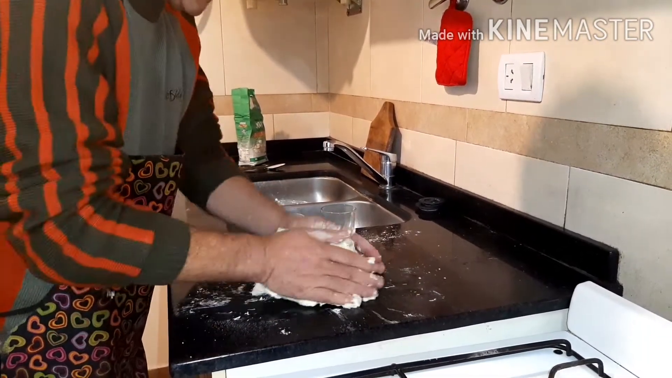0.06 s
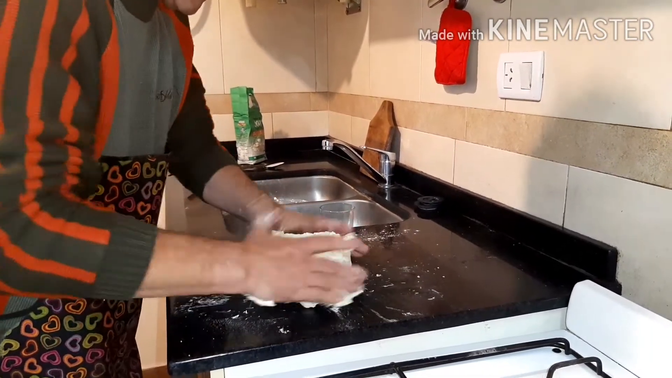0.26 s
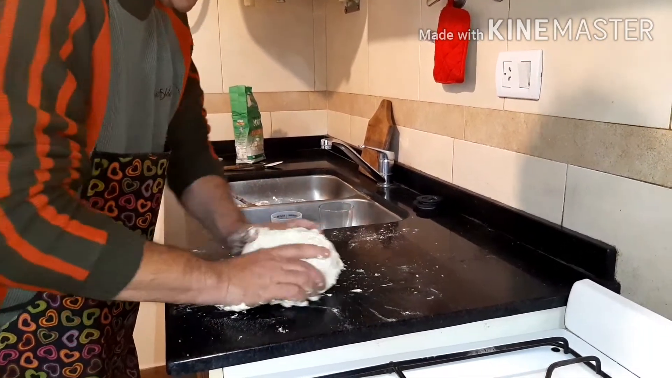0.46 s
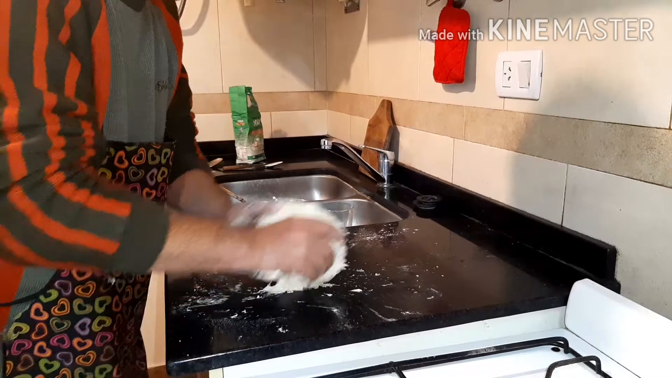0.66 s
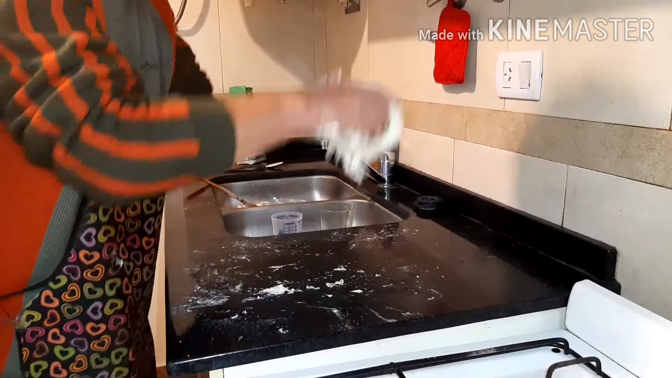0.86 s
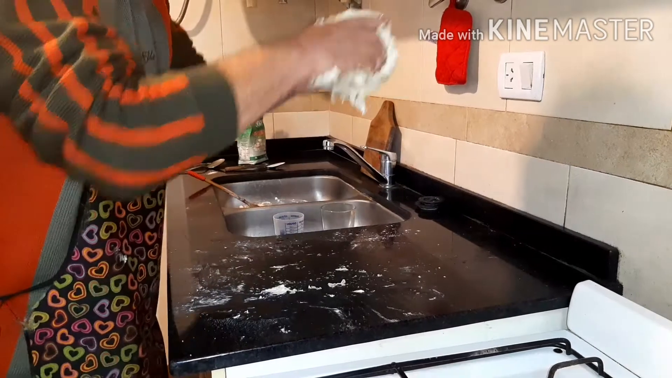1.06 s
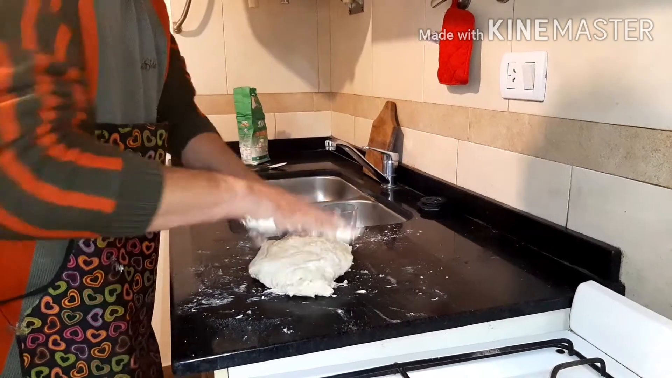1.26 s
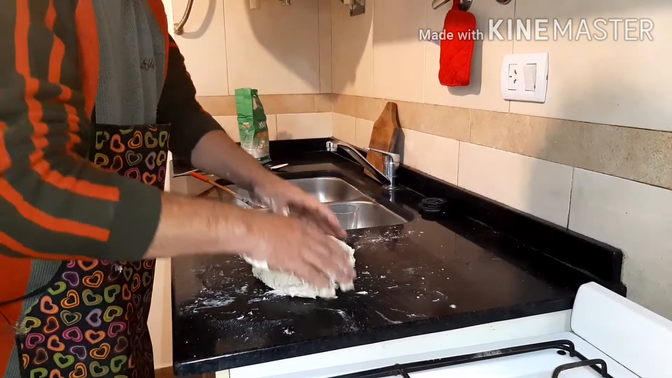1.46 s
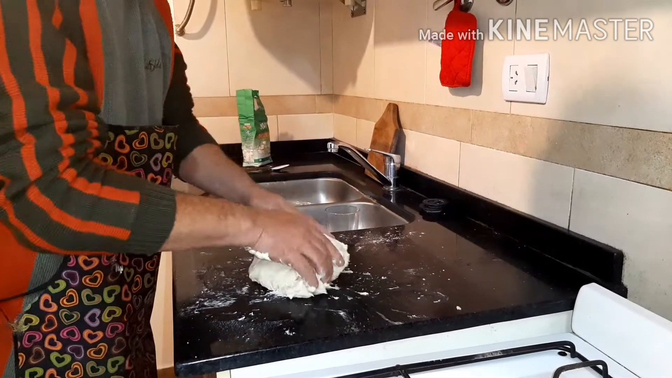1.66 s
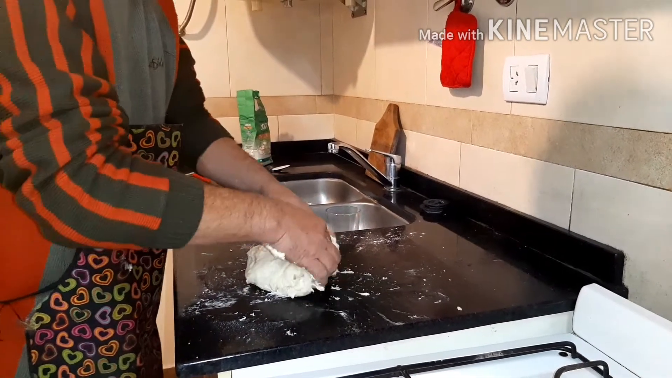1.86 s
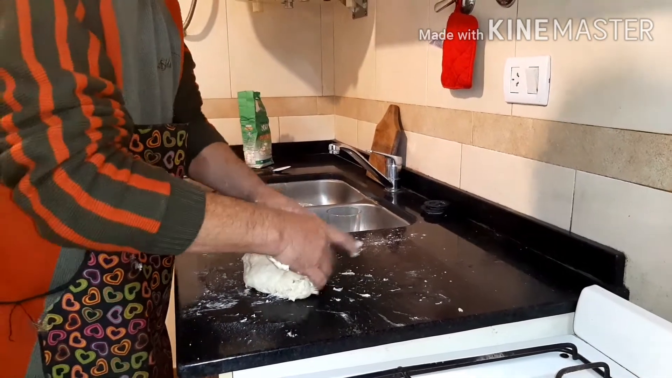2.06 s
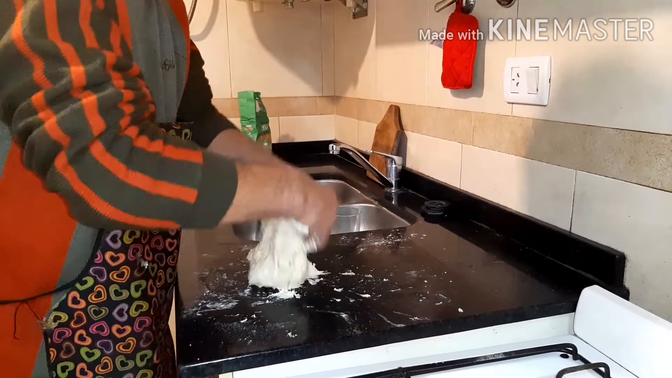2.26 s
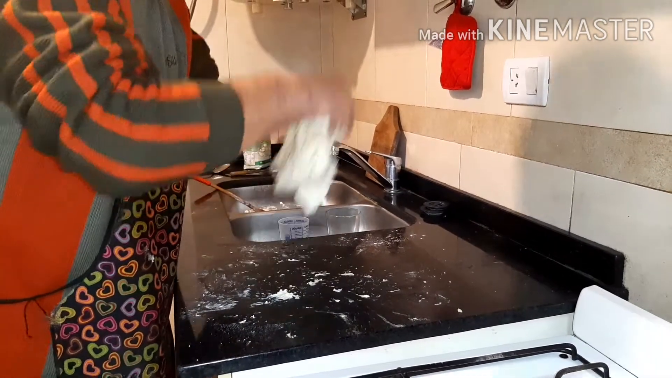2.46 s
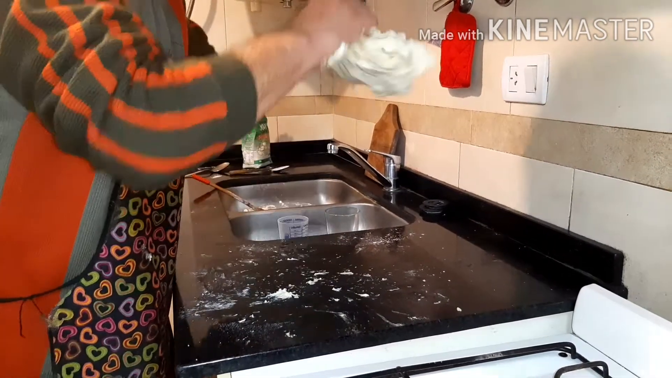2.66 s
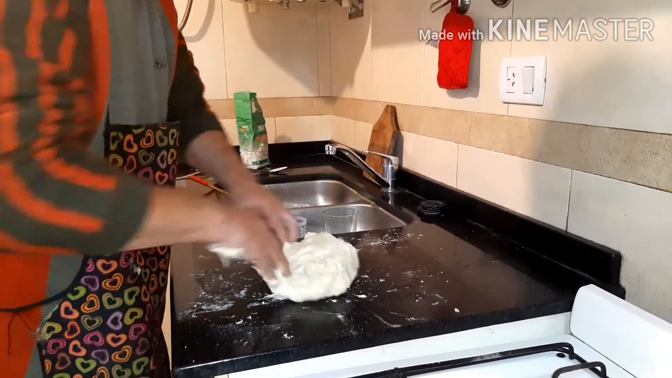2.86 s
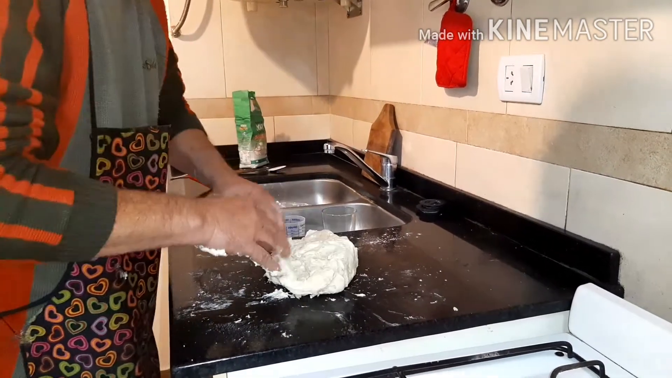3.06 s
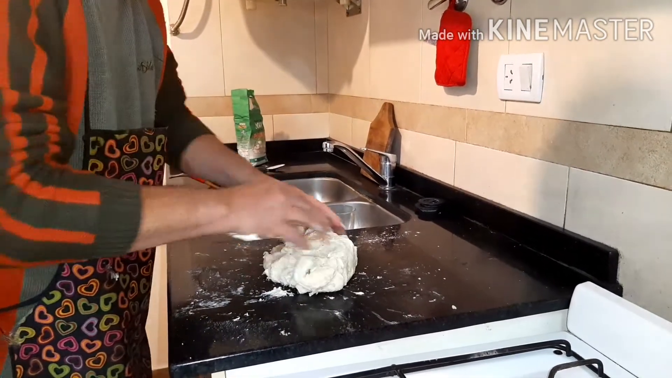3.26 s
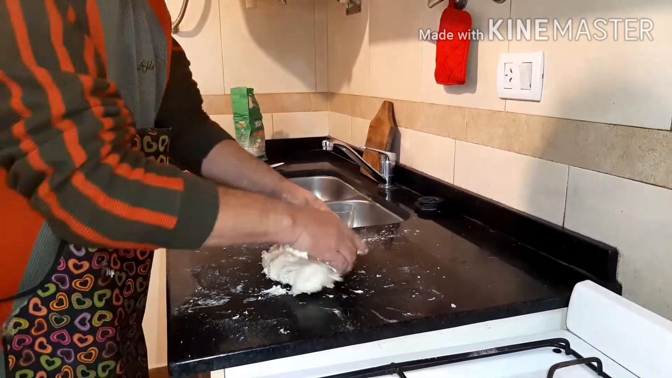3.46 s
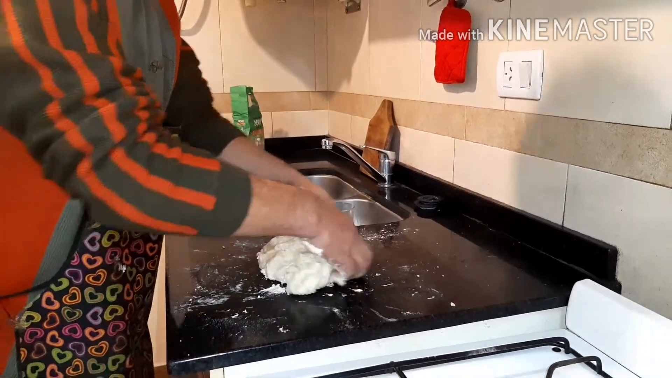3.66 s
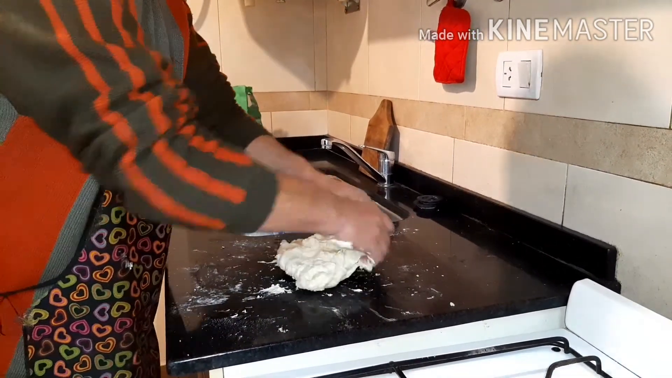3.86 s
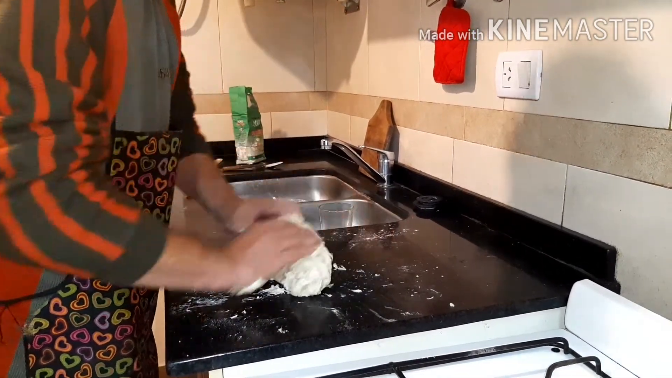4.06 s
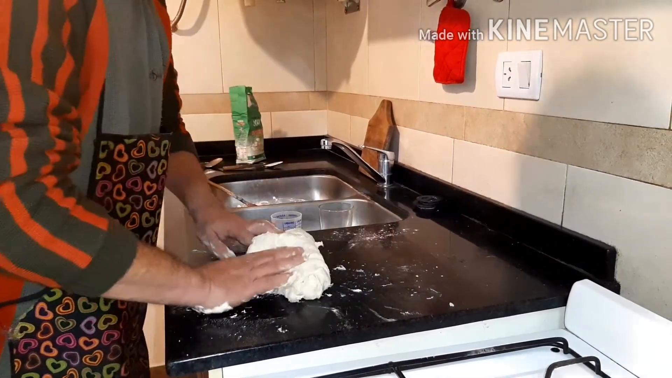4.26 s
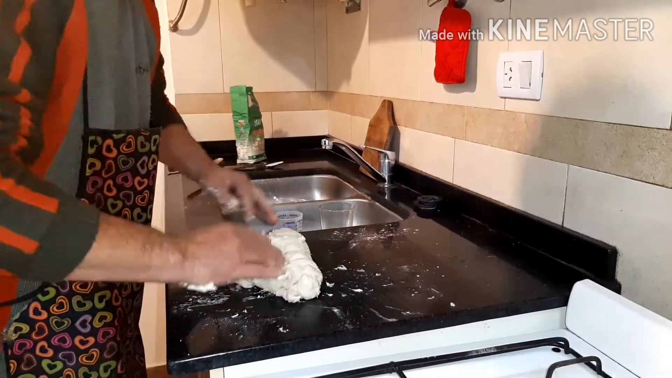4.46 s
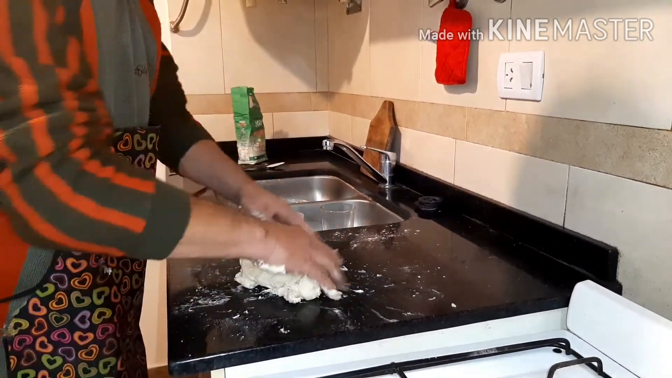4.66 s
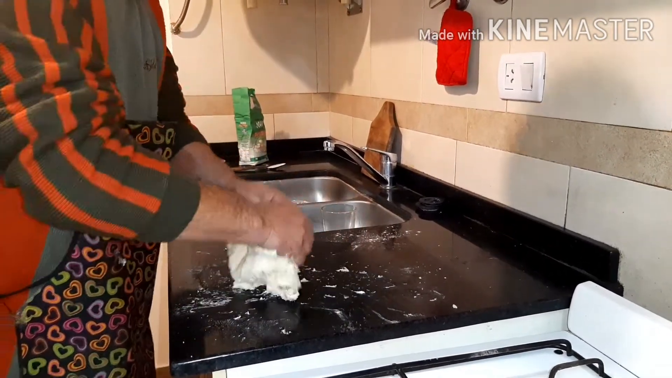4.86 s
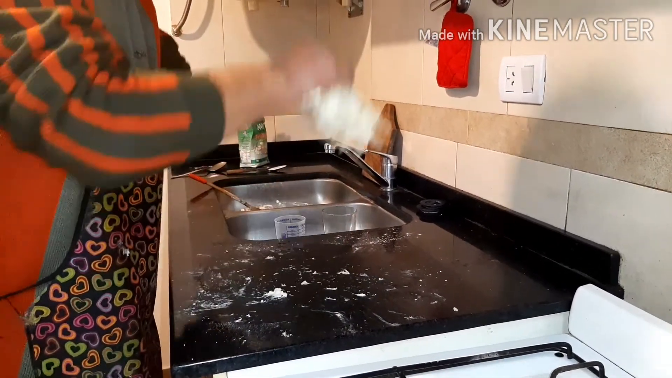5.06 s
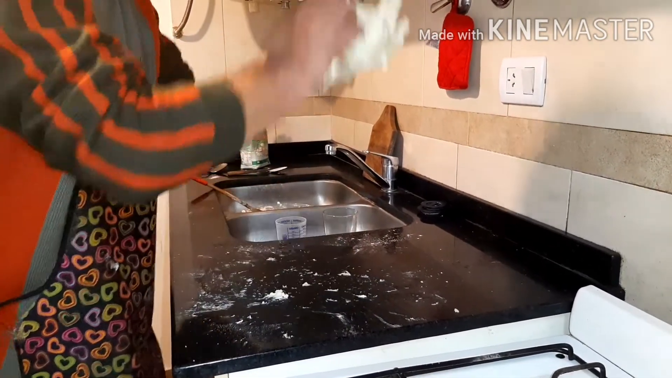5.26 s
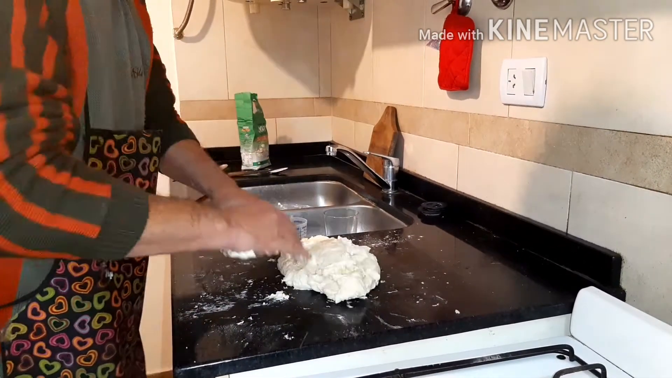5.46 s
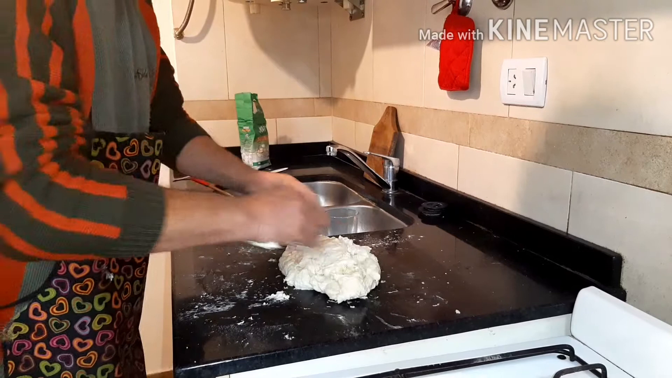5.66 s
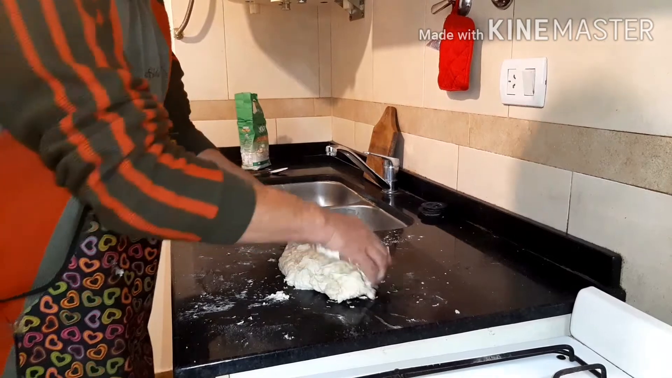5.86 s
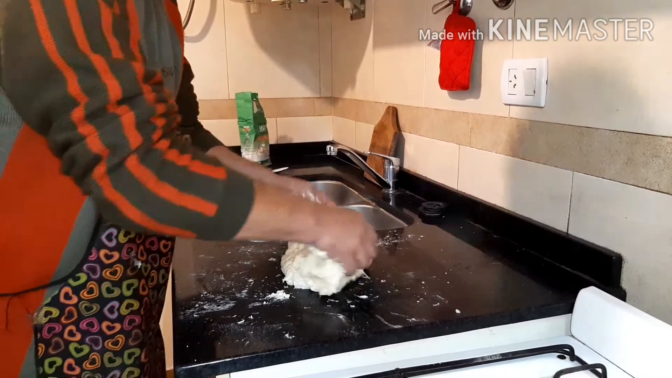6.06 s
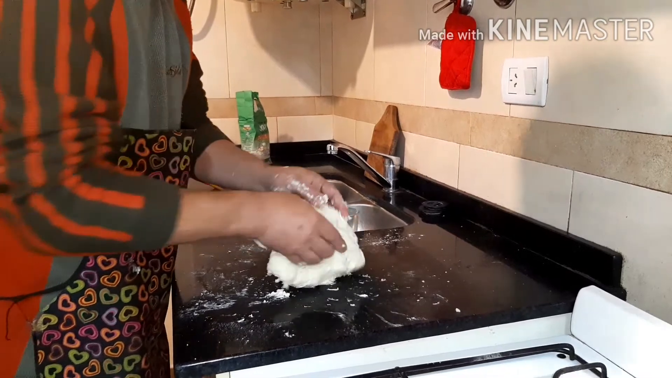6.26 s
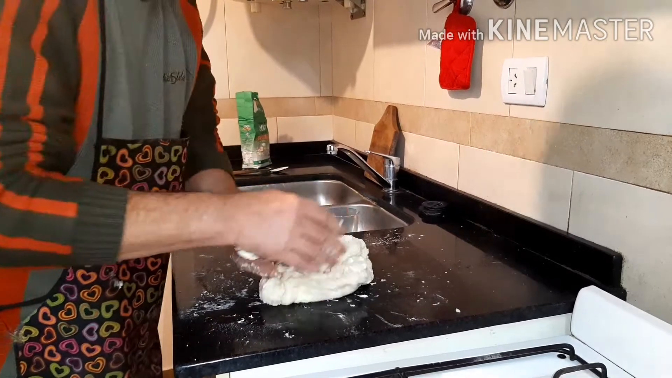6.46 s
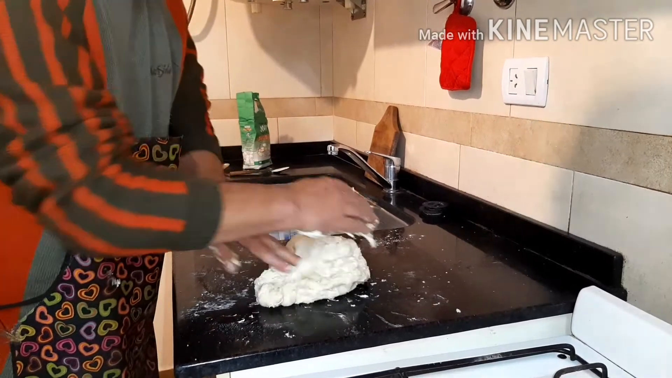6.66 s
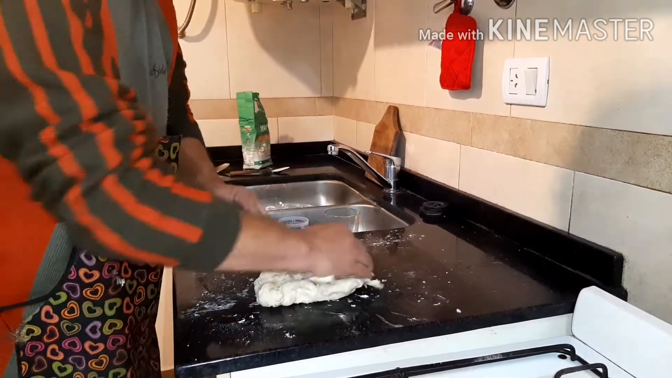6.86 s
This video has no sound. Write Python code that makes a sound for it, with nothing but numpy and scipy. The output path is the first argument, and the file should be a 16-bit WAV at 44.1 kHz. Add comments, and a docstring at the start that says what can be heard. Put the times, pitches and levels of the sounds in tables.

```python
"""Floury hands rub and pat soft dough on a stone kitchen counter: band noise swells, sleeves rustle, skin squeaks.
The lump is thrown down three times and folded in between. Each landing is wet skin smacking (noise bursts),
then weight thumping slab and cabinet (pushes on ringing modes). An air pocket pops under the second throw.
Sticky skin peels off twice before the third throw. Room reverberation follows every smack and thump;
room air and an appliance's hum last throughout."""
import sys
import numpy as np
from scipy import signal
from scipy.fft import rfft, irfft, next_fast_len
from scipy.io import wavfile
from scipy.ndimage import uniform_filter1d

SR = 44100
rng = np.random.default_rng(int(sys.argv[2]) if len(sys.argv) > 2 else 0)


def output_pcm(signal):
    """Save a mono or channel-first signal as 16-bit PCM at the path in sys.argv[1].

    Samples are clipped to [-1, 1] before scaling.
    """
    pcm = np.clip(np.atleast_2d(signal).T, -1, 1) * 32767
    wavfile.write(sys.argv[1], SR, np.round(pcm).astype(np.int16))


N = 305657
T = np.arange(N) / SR
FREQ = np.arange(N // 2 + 1) * SR / N


def undb(db):
    """Decibels to gain."""
    return 10 ** (np.asarray(db) / 20)


def across(points, hz=FREQ):
    """Read (frequency [Hz], value) points on a log-frequency axis."""
    at, value = np.transpose(points)
    return np.interp(np.log(hz + 1e-9), np.log(at), value)


def unit(x):
    """Scale to rms 1."""
    return x / np.sqrt(np.mean(x ** 2))


def ring(x, response):
    """Pass x through one impulse response per channel."""
    return signal.fftconvolve(np.atleast_2d(x), np.atleast_2d(response), axes=1)[:, :N]


def mode(hz, db, t60_s):
    """One decaying resonance."""
    t = T[:SR]
    decay = np.exp(-np.log(1000) * t / t60_s)
    return undb(db) * np.sin(2 * np.pi * hz * t) * decay


def even(burst):
    """Flatten a burst's spectrum but keep its phase, hence its rough timing, and its energy."""
    phase = np.angle(rfft(burst, 2 * len(burst)))
    flat = irfft(np.exp(1j * phase))[:len(burst)]
    return flat * np.linalg.norm(burst) / np.linalg.norm(flat)


def causal(points, size=2048):
    """Minimum-phase impulse response of a colour, by folding its cepstrum."""
    hz = np.arange(size // 2 + 1) * SR / size
    cepstrum = irfft(np.log(undb(across(points, hz))))
    cepstrum[1:size // 2] *= 2
    cepstrum[size // 2 + 1:] = 0
    return irfft(np.exp(rfft(cepstrum)))


def diffuse(points, size, alike_hz=850):
    """Coloured noise from all sides: bass alike at both ports, treble unrelated."""
    hz = np.arange(size // 2 + 1) * SR / size
    mid, side = rfft(rng.standard_normal((2, size)))
    alike = .97 / (1 + (hz / alike_hz) ** 4)
    mid = mid * np.sqrt((1 + alike) / 2)
    side = side * np.sqrt((1 - alike) / 2)
    return irfft(np.array([mid + side, mid - side]) * undb(across(points, hz)), size)


def noise(points):
    """Diffuse noise of rms 1 for the whole scene."""
    return unit(diffuse(points, size=next_fast_len(N))[:, :N])


def walk(rate_hz):
    """Smooth random drift with a spread near 1."""
    k = int(SR / rate_hz)
    steps = np.repeat(rng.standard_normal(N // k + 1), k)
    return 1.46 * uniform_filter1d(steps, k)[:N]


# throws: (time [s], crack drive [dB], crack fade [ms], spit drive [dB], edge push [dB], edge contact [ms],
#   weight push [dB], weight contact [ms], splat drive [dB], splat fade [ms], splat treble [dB],
#   flop lag [ms], flop level against weight and splat [dB])
THROWS = [(1.2221, -12, 7.4, -23.5, -19, 2.17, -9.5, 9.95, -35, 23, 14.5, 68, -5),
          (2.8612, -5, 1.95, -20, -14, 0.99, -29.5, 2.2, -38, 24, 6, 49, -8),
          (5.3908, -6.5, 1.66, -11.5, -24, 1.04, -18, 1.3, -19.5, 27.5, -3.5, 40, -2.5)]
EDGE_LAG_S, WEIGHT_LAG_S = 0.004355, 0.01731  # after first touch
CRACK_TREBLE_DB, SPIT_TREBLE_DB, SPIT_FADE_MS = 1.5, -8, 4.9
FLOP_TREBLE_DB, FLOP_FADE_MS = -17, 34


def landings():
    """A throw lands in stages: skin cracks, edge knocks and spits air, bulk thuds and splats, end flops."""
    wet, heavy = [], []
    for (s, crack_db, crack_ms, spit_db, edge_db, edge_ms, weight_db, weight_ms,
         splat_db, splat_ms, splat_treble_db, flop_ms, flop_db) in THROWS:
        edge_s, bulk_s, flop_s = s + EDGE_LAG_S, s + WEIGHT_LAG_S, s + flop_ms / 1000
        wet += [(s, crack_db, crack_ms, CRACK_TREBLE_DB),
                (edge_s, spit_db, SPIT_FADE_MS, SPIT_TREBLE_DB),
                (bulk_s, splat_db, splat_ms, splat_treble_db),
                (flop_s, splat_db + flop_db, FLOP_FADE_MS, FLOP_TREBLE_DB)]
        heavy += [(edge_s, edge_db, edge_ms),
                  (bulk_s, weight_db, weight_ms),
                  (flop_s, weight_db + flop_db, weight_ms)]
    return wet, heavy


# colour of a smack: (frequency [Hz], gain [dB])
SMACK_COLOUR = [(60, -41), (250, 13.5), (700, 14.5), (900, 6), (1150, 10), (1550, 5), (2100, 9),
                (2900, 3.5), (4000, -0.5), (7000, 0.5), (9000, -3), (15000, -0.5)]
# sticky skin peeling off stone or hand: (time [s], drive [dB], first fade [ms], treble [dB])
PEELS = [(3.684, -53, 13, -26), (4.684, -45.5, 12, 1)]


def smacks(bursts, grain_db=4, rise_s=0.00054, split_hz=3500):
    """Air spits from under wet skin as bursts of grainy noise, each with its own treble level."""
    pops = unit(rng.standard_normal(N) * undb(grain_db * walk(2500)))
    soften = signal.butter(1, split_hz, fs=SR, output="sos")
    out, t = np.zeros(N), T[:SR // 2]
    for s, db, fade_ms, treble_db in bursts:
        fade_s = fade_ms / 1000
        span = slice(int(s * SR), int(s * SR) + len(t))
        burst = even(pops[span] * (1 - np.exp(-t / rise_s)) * np.exp(-t / fade_s))
        burst = burst * np.exp(-t / (2 * np.pi * fade_s))  # second, slower fade ends each burst
        dull = signal.sosfilt(soften, burst)
        out[span] += undb(db) * (dull + undb(treble_db) * (burst - dull))
    return ring(out, causal(SMACK_COLOUR))


# slab and cabinet modes: (frequency [Hz], gain [dB], t60 [s])
COUNTER_MODES = [(67.33, -24.5, .9), (87.4, -11.5, 0.51), (98.9, -9.5, 0.47), (112, -9.5, 0.45),
                 (143, -7, 0.19), (170.96, -1.5, 0.29), (196.7, -2.5, 0.14), (242.2, -3, .25),
                 (279.8, -3, 0.22), (320.2, -6.5, 0.28), (348.4, -6.5, 0.3), (380.6, -3, 0.23),
                 (446, -12, 0.27), (496.6, -16.5, .3), (557, -9, 0.089), (610.7, -14.5, 0.15),
                 (691, 0, 0.041)]
# hand patting or pressing the dough: (time [s], push [dB], contact [ms])
PATS = [(.356, -44.5, 4.3), (.394, -37, 3.53), (.921, -52, 12), (1.571, -43.5, 2.1), (2.0, -47, 3),
        (3.358, -38, 1.78), (3.375, -32, 3.76), (3.418, -46, 1.8), (3.69, -48.5, .7), (4.38, -45, 6.4),
        (4.683, -32, 2.6), (4.77, -38, 5.5), (5.13, -38, 9.9), (5.27, -43, 6.8), (5.775, -38, 4.4),
        (5.845, -42.5, 3.45)]


def thuds(pushes, lump_hz=140, lump_db=6.5, lump_t60_s=0.062):
    """Each contact is a rounded push on the counter; a longer push favours the low modes."""
    force = np.zeros(N)
    for s, db, contact_ms in pushes:
        i = int(s * SR)
        push = np.sin(np.pi * np.minimum(T[:SR // 20] * 1000 / contact_ms, 1)) ** 2
        force[i:i + len(push)] -= undb(db) * push / push.sum()
    # neighbouring modes move oppositely, so the boom swells after contact
    slab = sum((-1) ** k * mode(*row) for k, row in enumerate(COUNTER_MODES))
    lump = mode(lump_hz, lump_db, lump_t60_s)  # one dead thump
    return ring(force, slab + lump)


POCKET_S, POCKET_HZ, POCKET_DB, POCKET_T60_S = 2.8617, 2232, -8, 0.0083


def pocket():
    """Air trapped under the second throw bursts once with a short ring."""
    kick = np.zeros(N)
    kick[int(POCKET_S * SR)] = 1
    return ring(kick, mode(POCKET_HZ, POCKET_DB, POCKET_T60_S))


# skin squeaking on polished stone: (middle [s], pitch [Hz], peak [dB], half-length to 1/e [s])
SQUEAKS = [(0.126, 1901, -58.5, 0.0314), (0.848, 1816, -64.5, 0.038), (6.775, 1955, -65, 0.052)]


def squeaks(scatter=0.037):
    """Skin sticks and slips at an unsteady rate for a moment."""
    out = 0
    for s, hz, db, length_s in SQUEAKS:
        phase = 2 * np.pi * np.cumsum(hz * (1 + scatter * walk(400))) / SR
        swell = np.exp(-((T - s) / length_s) ** 2)
        out = out + undb(db) * swell * np.sin(phase)
    return out


SWELL_POWER = 2.5  # higher is squarer


def swells(moves, rest_db):
    """Gain over time: moves swell and fade over a resting level; length is the half-power width."""
    power = undb(rest_db) ** 2
    for s, length_s, db in moves:
        power = power + undb(db) ** 2 * .5 ** (np.abs(2 * (T - s) / length_s) ** SWELL_POWER)
    return np.sqrt(power)


# colours of rubbing and of cloth: (frequency [Hz], relative level [dB])
RUB_COLOUR = [(800, -23), (2000, -12), (3500, -9.5), (6000, -3.5), (9000, -5.5), (12000, -0.5),
              (15500, -2.5)]
CLOTH_COLOUR = [(25, -29.5), (60, -8.5), (120, -2.5), (350, -2.5), (600, -8.5), (1000, -16.5),
                (1500, -19.5), (2000, -11.5), (3000, -21.5), (8000, -29)]
# floury hand sliding over dough and stone: (middle [s], length [s], level before rub_db [dB])
STROKES = [(.1, 0.2, -59), (.5, 0.16, -63.5), (.73, 0.073, -53), (.95, 0.13, -71), (1.7, 0.15, -66),
           (1.95, .07, -66), (2.08, 0.24, -69.5), (2.31, 0.12, -64.5), (2.52, 0.15, -66.5),
           (2.72, 0.051, -66), (3.125, 0.045, -63), (3.51, 0.1, -65.5), (3.69, 0.037, -76),
           (3.85, .16, -79), (4.03, .06, -72), (4.42, 0.1, -68), (4.82, 0.18, -60.5), (5.22, .1, -77),
           (5.88, .03, -66), (6.1, 0.13, -67.5), (6.3, 0.22, -73.5), (6.72, .1, -68.5)]
# sleeves and apron as arms reach, fold or swing: (middle [s], length [s], level before cloth_db [dB])
ARM_MOVES = [(.17, 0.61, -61.5), (.98, 0.51, -60), (2.05, 0.52, -68), (2.72, 0.5, -63.5),
             (3.5, 0.47, -64.5), (4.42, 0.88, -68.5), (5.03, 1, -59.5)]
RUB_REST_DB, CLOTH_REST_DB = -84, -78  # before rub_db, cloth_db: hands never quite still


def handling(rub_db=1, cloth_db=5, flour_grain_db=2, fold_db=1):
    """Flour hisses under the hands and cloth rustles, both a little uneven."""
    rub_gain = swells(STROKES, RUB_REST_DB) * undb(rub_db + flour_grain_db * walk(120))
    cloth_gain = swells(ARM_MOVES, CLOTH_REST_DB) * undb(cloth_db + fold_db * walk(35))
    return noise(RUB_COLOUR) * rub_gain + noise(CLOTH_COLOUR) * cloth_gain


# reverberation time: (frequency [Hz], t60 [s])
ROOM_T60 = [(80, 0.74), (250, 0.58), (1000, 0.5281), (2500, 0.4616), (5000, 0.42), (9000, 0.3),
            (15000, 0.12)]
# reverberation colour: (frequency [Hz], level before room_db [dB])
ROOM_COLOUR = [(35, -16), (80, -2), (150, -6), (400, -3), (1500, -3.5), (4000, -1.5), (8000, -5.5),
               (14000, -1)]


def kitchen(build_s=0.0017, size=32768, room_db=-29.5):
    """Small tiled room: reflections build up in a few ms, each band dies at its own rate."""
    t, hz = T[:size], np.arange(size // 2 + 1) * SR / size
    field = rfft(diffuse(ROOM_COLOUR, size=size))
    centres_hz = np.array(ROOM_T60)[:, 0]
    tail = 0
    for share, (_, t60_s) in zip(np.eye(len(ROOM_T60)), ROOM_T60):
        band = across(np.column_stack([centres_hz, share]), hz)
        tail = tail + irfft(field * band) * np.exp(-np.log(1000) * t / t60_s)
    return tail * (1 - np.exp(-(t / build_s) ** 2)) * undb(room_db)


# room air: (frequency [Hz], relative density [dB per Hz])
AIR = [(15, -33.5), (25, -24), (64, 2), (101, -1), (173, -10.5), (359, -13), (614, -26.5), (1140, -24),
       (1490, -31.5), (2060, -21), (3500, -43), (5880, -43), (6550, -30), (8580, -43.5), (15500, -37.5)]
AIR_DB = -57.5
# appliance tones: (frequency [Hz], rms level [dB])
HUM = [(64.6, -61.5), (122, -67), (446.8, -77.5), (543.7, -79.5), (1389, -84), (2083, -81.5), (6395, -85)]


def background(waver_rad=0.41):
    """Room air is coloured noise; appliance tones waver slightly in phase."""
    hum = 0
    for hz, db in HUM:
        hum = hum + np.sqrt(2) * undb(db) * np.sin(2 * np.pi * hz * T + waver_rad * walk(3.4))
    return undb(AIR_DB) * noise(AIR) + hum


PORT_LAG_S = .00036


def ports(x):
    """Direct sound reaches the right port a moment before the left."""
    return np.array([np.interp(T - PORT_LAG_S, T, x[0]), x[0]])


# left port hears a little more: (frequency [Hz], left minus right [dB])
LEAN = [(60, 3.6), (110, 3), (200, 1), (380, 3.2), (900, 2.2), (2400, 3), (4400, .8), (15000, 1)]
# left port trails in the bass: (frequency [Hz], lag [rad])
BASS_LAG = [(40, .7), (90, .42), (190, .32), (280, 0)]


def microphone(sound):
    """The two ports differ a little in level and, in the bass, in phase."""
    half = np.array([[.5], [-.5]])
    level = undb(half * across(LEAN))
    turn = np.exp(-1j * half * across(BASS_LAG))
    return irfft(rfft(sound) * level * turn, N)


PATCH_WIDTH = 0.96  # share of direct smack power that differs between ports


def scene(smack_room_db=0, thud_room_db=-4.0):
    """Counter and hands, heard directly and by way of the kitchen walls."""
    wet, heavy = landings()
    bursts = wet + PEELS
    room, smack, thud = kitchen(), smacks(bursts), thuds(heavy + PATS)
    echo = ring(undb(smack_room_db) * smack + undb(thud_room_db) * thud, room)
    # the wet patch is wide: each port also hears pops of its own
    own_pops = np.vstack([smacks(bursts), smacks(bursts)])
    direct = ports(np.sqrt(1 - PATCH_WIDTH) * smack + thud + pocket())
    direct = direct + np.sqrt(PATCH_WIDTH) * own_pops
    return microphone(direct + echo + handling() + squeaks() + background())


TOP_HZ = 15650


def record(dry, low_hz=46):
    """A phone thins the deepest bass, rounds the highest peaks and cuts the top."""
    thinned = signal.sosfilt(signal.butter(2, low_hz, "high", fs=SR, output="sos"), dry)
    rounded = np.tanh(thinned)
    return signal.sosfilt(signal.ellip(10, .1, 80, TOP_HZ, fs=SR, output="sos"), rounded)


dry = scene()
out = record(dry)
output_pcm(out)
```